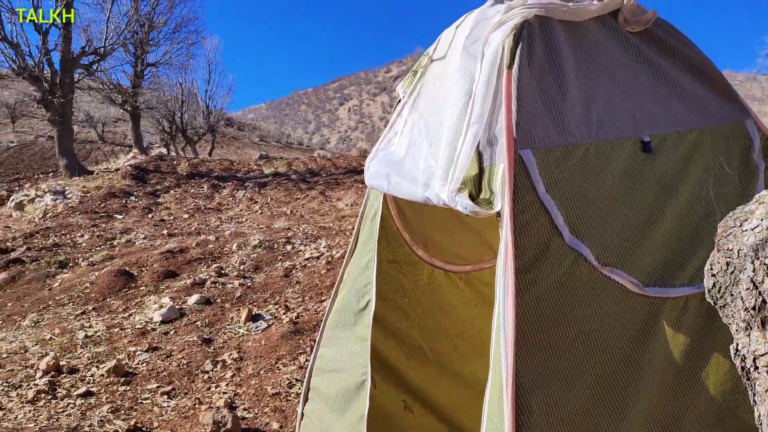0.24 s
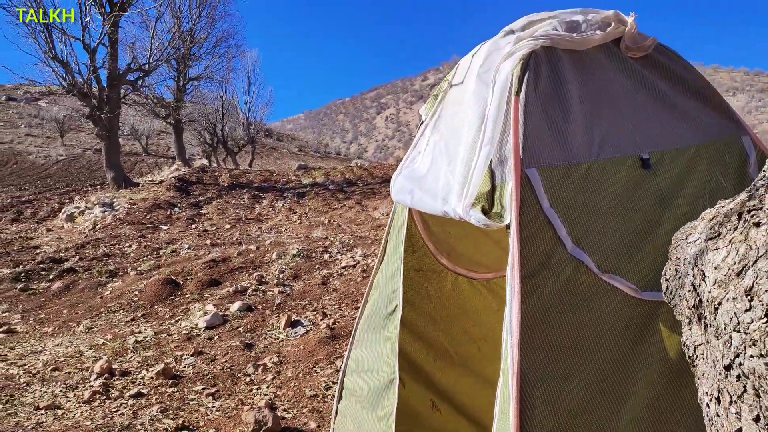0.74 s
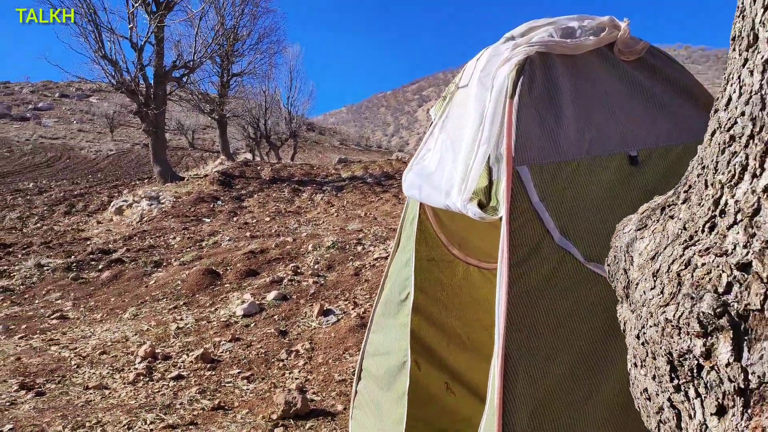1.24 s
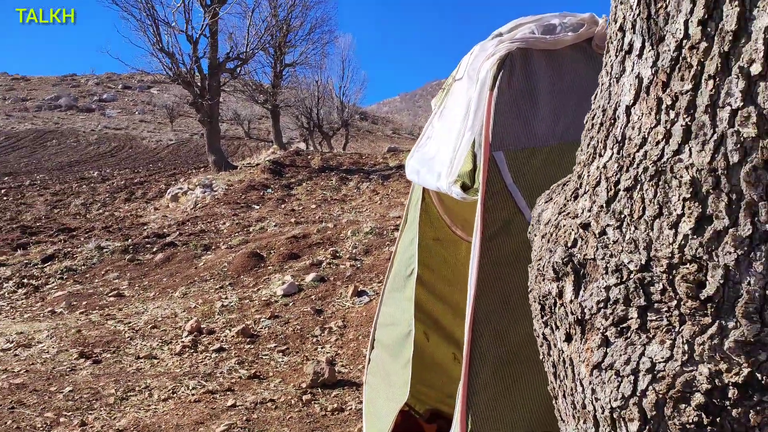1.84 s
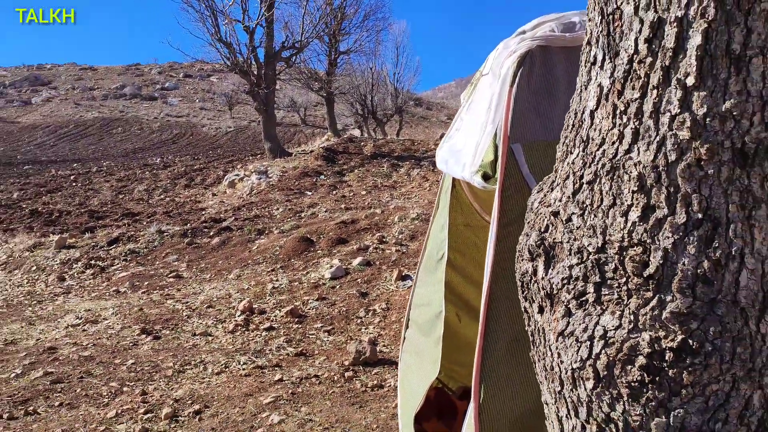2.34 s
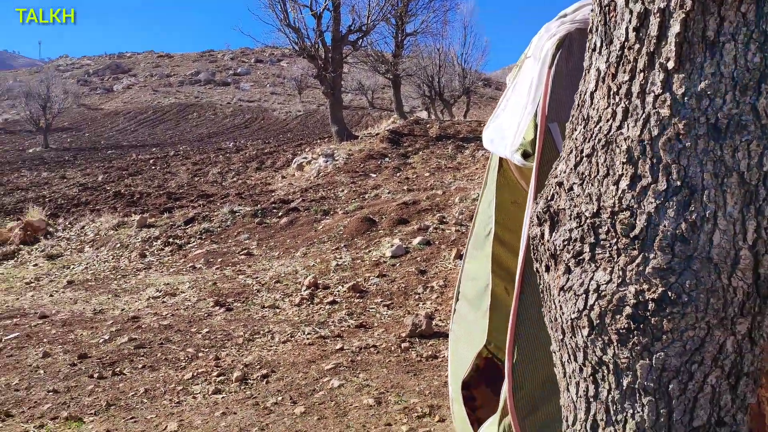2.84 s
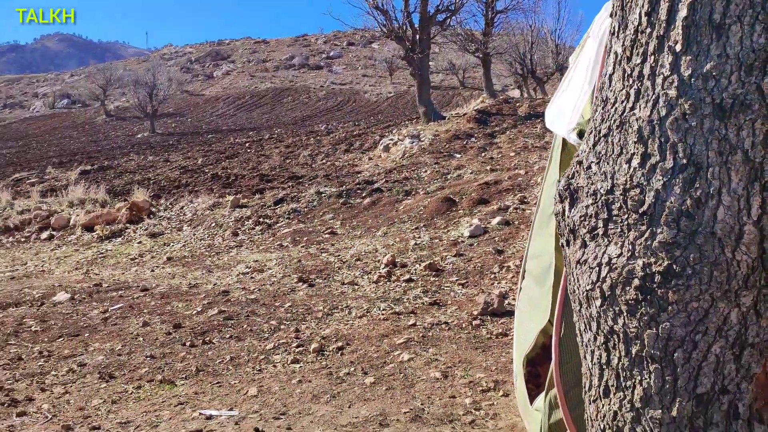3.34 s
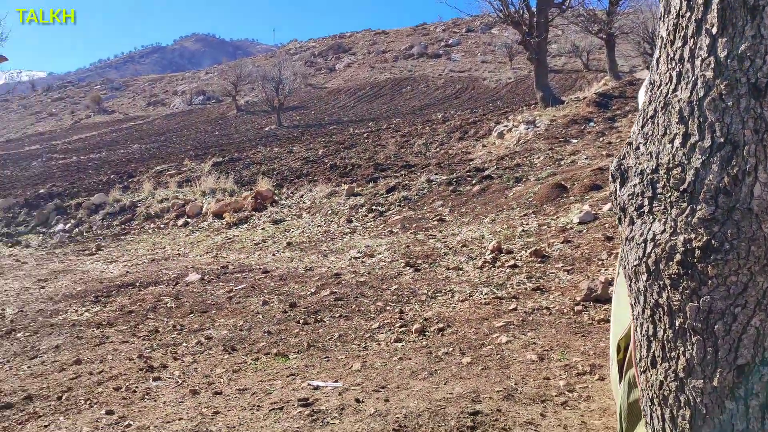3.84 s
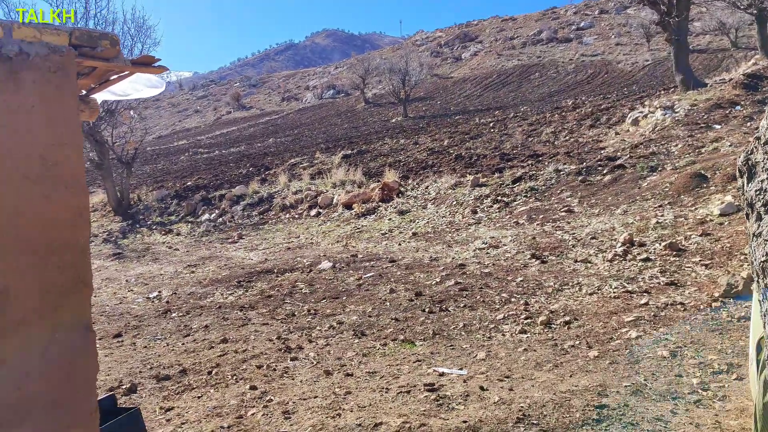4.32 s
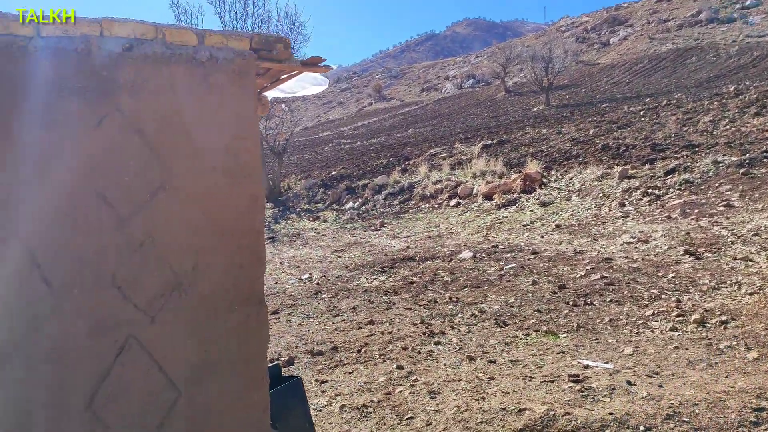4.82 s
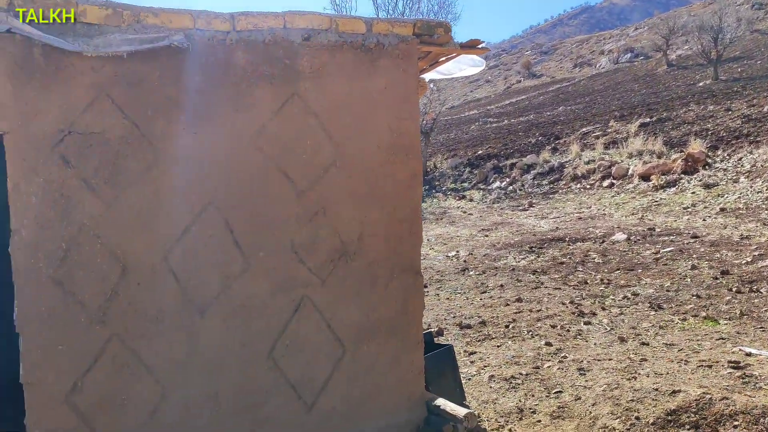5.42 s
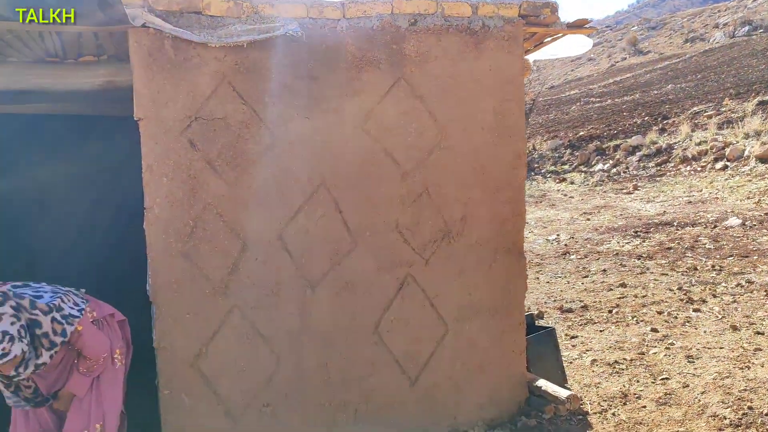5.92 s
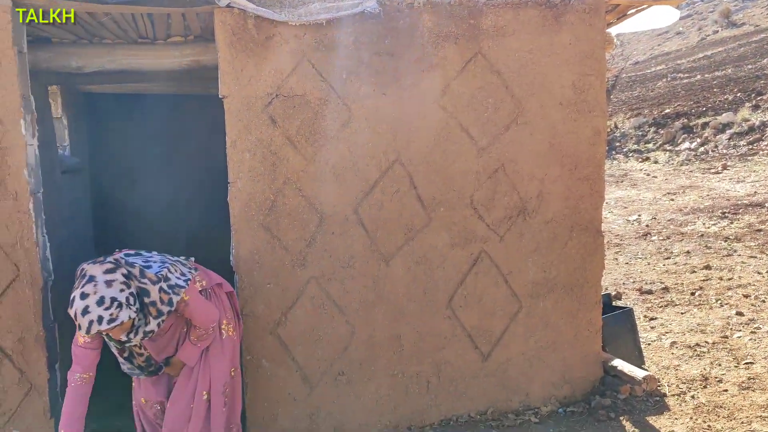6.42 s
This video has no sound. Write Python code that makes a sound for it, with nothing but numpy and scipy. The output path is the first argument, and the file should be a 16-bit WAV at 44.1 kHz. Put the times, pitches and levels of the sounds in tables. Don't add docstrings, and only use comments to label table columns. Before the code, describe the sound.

An open dirt yard, captured close in stereo by a hand-held device, with only a short dry reflection from ground and wall. A far engine drones throughout, a low hum near 84 Hz with a breathy roar, creeping up to about 95 Hz and growing louder; a fainter low machine sags and fades. After tiny dabs, a stiff broom sweeps gritty soil at about 0.25, 1.0, 1.55, 2.1 and 2.65 seconds, each stroke swelling, then lifting off sharply with trickling grit. A faint bird coos, rising, at 0.95. A bright twig snap cracks at 1.76, and pebbles tick throughout. The crisp broom begins mostly right, then broadens toward the left between 2.8 and 5 seconds. Lighter strokes follow near 3.3, 3.9, 4.4, 5.1, 5.8 and 6.4. Soft handling knocks land at 2.3, 2.8, 3.3 and 4.6, with higher taps around 5.7.

```python
import sys
import numpy as np
from scipy import signal
from scipy.io import wavfile
from scipy.ndimage import uniform_filter1d

SR = 44100
rng = np.random.default_rng(int(sys.argv[2]) if len(sys.argv) > 2 else 0)


def inscribe(sig):
    pcm = np.round(np.clip(np.atleast_2d(sig).T, -1, 1) * 32767)
    wavfile.write(sys.argv[1], SR, pcm.astype(np.int16))


def attenuation_scalar(level_db):
    decades = np.asarray(level_db, float) / 20
    return 10 ** decades


N = 294147

# (t/s, firing f/Hz, nearness/dB, ground echo on the firing tone/dB, load brightening the roar/dB)
ENGINE = [(0.0, 84.0, -8, 1, -3), (0.6, 84.2, -8, 7.5, 0.9), (1.2, 86.2, -5, 0, -4),
          (1.7, 87.2, -1, -9.5, -4), (2.2, 88.6, -4.5, -9, -6.5), (2.6, 89.6, -3, -1.5, -4.5),
          (3.2, 90.2, -2.5, -1.5, -2), (3.7, 91, -2, 0, 4), (4.1, 92, 0.7, -1.5, 2),
          (4.7, 93, 1, -2.2, 2.5), (5.2, 94, 2, 2.5, 0), (5.75, 94.9, 6.5, -1, -4), (6.2, 95, 3, 0.3, -1),
          (6.67, 95, 5, 2.5, -0.5)]


def evened(x):
    return x / np.sqrt(np.mean(x ** 2) + 1e-20)


def along(rows, t):
    s, *columns = np.transpose(rows)
    return [np.interp(t, s, c) for c in columns]


def across(rows, hz):
    f, *columns = np.transpose(rows)
    return [np.interp(np.log(hz + 1), np.log(f + 1), c)[:, None] for c in columns]


def smoothed(x, bins, frames):
    return uniform_filter1d(uniform_filter1d(x, size=bins, axis=1), size=frames, axis=2)


def drift(count, span_s):
    width = max(int(span_s * SR), 1)
    return evened(uniform_filter1d(uniform_filter1d(rng.standard_normal(count), width), width))


def split(x, edge_hz):
    low = signal.sosfiltfilt(signal.butter(4, edge_hz, fs=SR, output="sos"), x)
    return low, x - low


def firing_turns(hz):
    return 2 * np.pi * np.cumsum(hz + 0.7 * drift(N, 0.039)) / SR


def roar():
    # (f/Hz, level per Hz/dB)
    rumble_curve = [(12, -38), (24, -20), (45, -4), (63, -15), (87, 1), (109, -3.5), (135, -5),
                    (179, -12.5), (235, -20), (600, -13), (780, -68), (1320, -120)]
    # (f/Hz, right level/dB, left level/dB)
    roar_curve = [(300, -24, -28.5), (560, -7.5, -16.5), (695, -1, 1), (850, 3, -2), (1070, 0.5, -3.5),
                  (1430, 1, -6.5), (1915, 0.5, -8.5), (2266, -5, -13.5), (2970, -13, -20.5),
                  (4140, -27.5, -27), (5800, -35, -42)]
    # (f/Hz, left-right likeness 0-1)
    likeness = [(30, 1), (100, 0.97), (250, 1), (500, 1), (1000, 0.45), (3000, 0.11)]
    rumble_at_0_db, roar_at_0_db = -47.5, -55
    rumble_share = 0.49
    lead_s = 0.00034

    frames, hz = N // 512 + 5, np.fft.rfftfreq(2048, 1 / SR)
    f = hz[:, None]
    a, b, c, d, patches = rng.standard_normal((frames, 1025, 5)).T
    patches = evened(uniform_filter1d(uniform_filter1d(patches, size=16, axis=0), size=7, axis=1))
    t = np.arange(frames) * 512 / SR
    _, near_db, _, load_db = along(ENGINE, t)

    bright = np.clip((f - 1250) / 400, 0, 1)
    level_db = roar_at_0_db + near_db * np.clip(f / 700, 0.4, 1)
    level_db = level_db + bright * (load_db + 1) - 9.5 + 1.52 * patches
    right_db, left_db = across(roar_curve, hz)

    rumble_db = rumble_at_0_db + rumble_share * near_db
    rumble_db = np.where(f < 70, -45 - 1.9 * t, rumble_db)
    rumble = attenuation_scalar(across(rumble_curve, hz)[0] + rumble_db - 7)

    same = np.clip(across(likeness, hz)[0], -1, 1)
    right = a + 1j * b
    early = np.exp(2j * np.pi * f * lead_s)
    left = same * right * early + np.sqrt(1 - same ** 2) * (c + 1j * d)
    left = left * np.hypot(attenuation_scalar(level_db + left_db), rumble)
    right = right * np.hypot(attenuation_scalar(level_db + right_db), rumble)
    return signal.istft(np.array([left, right]), nperseg=2048, noverlap=1536)[1][:, :N]


def drone():
    hz, near_db, ground_db, _ = along(ENGINE, np.arange(N) / SR)
    turns = firing_turns(hz)
    firing_db = -49.5 + 0.87 * near_db + ground_db + 0.63 * drift(N, 0.074) + 1.2 * drift(N, 0.18)
    double_db = -59 + 0.66 * near_db + 2.1 * drift(N, 0.021) + 1.2 * drift(N, 0.09)
    tones = attenuation_scalar(firing_db) * np.sin(turns) + attenuation_scalar(double_db) * np.sin(2 * turns)
    rumble, upper = split(roar(), 940)
    pulses = attenuation_scalar(0.32 * np.cos(turns) + 1.15 * drift(N, 0.0059))
    return np.sqrt(2) * tones + rumble + upper * pulses


def pump():
    # (f/Hz, glide/Hz per s, level/dB, fade/dB per s)
    hum = (53, -2.6, -65, -2.5)
    hz, hz_per_s, db, db_per_s = hum
    t = np.arange(N) / SR
    level = attenuation_scalar(db + db_per_s * t + 1.9 * drift(N, 0.072))
    return np.sqrt(2) * level * np.sin(2 * np.pi * (hz + hz_per_s * t / 2) * t)


def grit(per_s, spread_db):
    size = attenuation_scalar(spread_db * np.minimum(rng.exponential(1, N), 4)) * rng.choice([-1., 1.], N)
    return evened(size * (rng.random(N) < per_s / SR))


def pressure(t):
    # (touch t/s, swell/s, hold/s, bristle pressure/dB, share of low scrape/dB)
    strokes = [(0.246, 0.16, 0.051, -25.5, -5.5), (1.013, 0.17, 0.013, -25, -4.5),
               (1.551, 0.12, 0.018, -27, -2.5), (2.073, 0.08, 0.091, -31, 0.5),
               (2.651, 0.087, 0.1, -34.5, 3), (3.303, 0.1, 0.078, -34, -1.5),
               (3.868, 0.072, 0.15, -42.5, 1.1), (4.436, .11, 0.061, -37, -2.5),
               (5.07, .12, 0.08, -34.5, -4), (5.779, 0.095, 0.017, -32.5, -2),
               (6.387, 0.11, 0.056, -38, -1)]
    # (touch t/s, swell/s, hold/s, pressure/dB, share of low scrape/dB)
    dabs = [(0.07, .01, 0.027, -70, -6), (0.147, 0.013, 0.047, -45.5, -6), (0.657, 0.016, 0.035, -67, 5),
            (0.93, .015, .002, -58, 2.5), (1.761, 0.0034, 0.015, -34.5, 2.9),
            (1.907, .015, 0.029, -61.5, 9), (2.024, 0.019, 0.018, -53.5, 3), (2.49, .02, .1, -68.5, 2),
            (3.042, .02, 0.023, -58, -11), (3.147, 0.0057, 0.074, -42, 1.5),
            (3.666, .012, 0.096, -58.5, -4), (3.809, 0.025, 0.019, -45.5, -3.5),
            (4.386, 0.015, 0.0084, -52, -4), (4.745, 0.014, 0.045, -58.5, -10),
            (4.87, 0.014, 0.13, -64, -4), (5.447, 0.044, 0.023, -59, -7.5), (5.623, .015, 0.028, -68, -14),
            (6.116, .015, 0.041, -74, -7), (6.206, 0.015, 0.12, -65, 4.5)]
    landing_db, swell_bend = -30, 2.12
    lift_db_per_s, lift_knee_s = 227, 0.01
    settle_db, settle_db_per_s = -25, 68
    dull_per_db = 0.1

    touch, swell, hold, peak_db, scrape_db = np.transpose(strokes + dabs)[:, :, None]
    swell = np.maximum(swell, 0.002)
    after = np.maximum(t - touch - swell - np.maximum(hold, 0), 0)
    rise_db = landing_db * np.maximum(1 - (t - touch) / swell, 0) ** swell_bend
    lift_db = -lift_db_per_s * (np.hypot(after, lift_knee_s) - lift_knee_s)
    settling = attenuation_scalar(settle_db - settle_db_per_s * after)
    shape = attenuation_scalar(np.maximum(rise_db, -200)) * np.hypot(attenuation_scalar(lift_db), settling)
    fine = attenuation_scalar(peak_db) * shape
    low = fine * attenuation_scalar(scrape_db) * shape ** -dull_per_db
    return np.linalg.norm(fine, axis=0), np.linalg.norm(low, axis=0)


def broom():
    t = np.arange(N) / SR
    fine, scrape = [np.interp(t, t[::64], gain) for gain in pressure(t[::64])]
    clumps_db = 0.92 * drift(N, 0.00058) + 1.2 * drift(N, 0.027)
    shared, own = grit(5000, 3.4), np.array([grit(9000, 3.2), grit(9000, 0.92)])
    skips = 0.88 * shared + own + 0.65 * rng.standard_normal((2, N))
    bristles = evened(skips * attenuation_scalar(clumps_db))
    grain_s = 0.0012
    trickle = signal.lfilter([1], [1, -np.exp(-1 / (grain_s * SR))], abs(grit(25, 2.5)))
    air = rng.standard_normal((2, N)) * np.hypot(1, attenuation_scalar(-4.5) * evened(trickle))
    bright = fine * bristles + attenuation_scalar(-72.5) * air
    dull = (scrape - fine) * bristles + (attenuation_scalar(-68) - attenuation_scalar(-71)) * air
    return bright + split(dull, 9340)[0]


def pebbles():
    # (t/s, peak level/dB, share of low scrape/dB)
    ticks = [(0.1555, -39, -7), (0.7632, -40, 2.5), (0.836, -36.5, -0.5), (0.9472, -33, -7),
             (1.4501, -41.5, -5), (1.477, -36.5, -6), (1.5284, -37, -3), (1.7604, -8.5, -26),
             (1.929, -42, 3), (1.9555, -51, -13.5), (1.9794, -42, 3), (2.0981, -24, 3), (2.4618, -41, -14),
             (2.4783, -37, -11), (2.5945, -41, -7), (3.0609, -34.5, -2), (3.0899, -32, -22),
             (3.6696, -39.5, 5.5), (4.3979, -33, -5), (4.7536, -38, -8), (4.8753, -41, -15),
             (5.1312, -25, -9), (5.581, -49, 10), (5.6351, -41, -11), (5.663, -41, -4), (6.12, -42.5, -3),
             (6.131, -37.5, 2), (6.1529, -37, -2), (6.1963, -37, 1), (6.2094, -40.5, 5.5)]
    rattle_s = 0.0016
    out, t = np.zeros(N), np.arange(800) / SR
    shape = np.exp(-t / rattle_s) * np.minimum(0.45 + t / 0.001, 1)
    for s, db, scrape_db in ticks:
        snap = rng.standard_normal(800) + 0.96 * (t == 0)
        low, high = split(attenuation_scalar(db - 6) * snap * shape, 5900)
        out[round(s * SR):][:800] += low * attenuation_scalar(scrape_db) + high
    return out


def yard(x, t60=0.088, wet_db=-11):
    taps = np.zeros((2, 8000))
    at = np.arange(10, 7980, 20) + rng.integers(0, 20, (2, 399))
    np.put_along_axis(taps, at, rng.choice([-1., 1.], at.shape), 1)
    taps *= attenuation_scalar(-60 * np.arange(8000) / SR / t60)
    tail = signal.fftconvolve(x, taps / np.linalg.norm(taps[0]), axes=1)[:, :N]
    return (x + attenuation_scalar(wet_db) * tail) / np.sqrt(1 + attenuation_scalar(2 * wet_db))


def ports(x):
    # (t/s, share of the turn 0-1, right port late/ms)
    turn_curve = [
        (0, 0.27, 0.21),
        (1.5, 0.26, 0.33),
        (2.8, 0.48, 0.4),
        (4, 0.8, 0.47),
        (5.2, 1, 0.394),
        (6.67, 0.98, 0.42),
    ]
    # (f/Hz, right before/dB, right after/dB, left before/dB, left after/dB)
    port_curve = [(854, -40, -17.5, -49, -15), (1650, -29.5, -13, -48, -19.5),
                  (2160, -20.5, -9.5, -39.5, -11), (2850, -17.5, -9, -37, -10),
                  (4200, -19.5, -7.5, -25, -12), (4780, -20.5, -15, -31.5, -8.5),
                  (7200, -23, -15, -30, -11), (7900, -27, -19, -42, -19), (8500, -17, -10, -47, -27),
                  (9200, -9, -6, -35, -17), (10460, -11, -10, -34, -7.5), (11750, -3.5, 0.1, -31.5, -13),
                  (13390, -10.5, -7.5, -34, -9), (16700, -12, -16, -18, -8)]
    hz, t, z = signal.stft(x, SR, nperseg=256, noverlap=192)
    turn, late_ms = along(turn_curve, t)
    turn = np.clip(turn, 0, 1)
    right0, right1, left0, left1 = across(port_curve, hz)
    gain = attenuation_scalar([left0 + turn * (left1 - left0), right0 + turn * (right1 - right0)])
    top = (hz > 8500) & (hz < 15500)
    gain /= np.sqrt((gain[:, top] ** 2).sum((0, 1)) / 4 / len(hz))
    z = z * gain
    z[1] *= np.exp(-2j * np.pi * hz[:, None] * late_ms / 1000)
    return signal.istft(z, SR, nperseg=256, noverlap=192)[1][:, :N]


def bird():
    # (start t/s, length/s, first f/Hz, last f/Hz, level/dB)
    call = (0.955, .145, 280, 330, -59)
    start, length, first_hz, last_hz, db = call
    swell_db = -8
    u = np.arange(0, length, 1 / SR) / length
    turns = 2 * np.pi * np.cumsum(first_hz + (last_hz - first_hz) * u) / SR
    level = np.sqrt(2) * attenuation_scalar(db + swell_db * (1 - u)) * signal.windows.tukey(len(u), 0.3)
    out = np.zeros(N)
    out[round(start * SR):][:len(u)] += level * np.sin(turns)
    return out


def knocks():
    # (t/s, peak level/dB, f/Hz)
    taps = [
        (2.287, -39, 300),
        (2.799, -47, 300),
        (3.26, -46, 337),
        (4.592, -42, 300),
        (5.653, -43, 850),
        (5.716, -38.5, 840),
    ]
    out, t = np.zeros(N), np.arange(600) / SR
    for s, db, hz in taps:
        out[round(s * SR):][:600] += attenuation_scalar(db + 7) * np.sin(2 * np.pi * hz * t) * np.exp(-t / 0.0017)
    return out


def scene():
    return ports(yard(broom() + pebbles())) + drone() + pump() + bird() + knocks()


def thinned(x, edge_hz=15650, near_hz=1400, weak_per_db=0.24, sudden_db=10):
    # (f/Hz, threshold in spreads of chance; 0 = half is lost)
    loss = [(600, -9), (1200, -3), (2000, -1.9), (3000, -1), (4700, 0), (6200, .3), (7200, .05),
            (8300, .25), (9500, -.4), (11800, -.7), (13500, -.35), (15300, .1)]
    hz, t, z = signal.stft(x, SR, nperseg=2048, noverlap=1536)
    power, bins = abs(z) ** 2 + 1e-20, int(near_hz / hz[1])
    near = uniform_filter1d(power, bins, 1)
    local = smoothed(power, 9, 5)

    chance = rng.standard_normal((len(t), len(hz), 3)).T
    chance = chance[:2] + 1.6 * chance[2]
    narrow = evened(smoothed(chance, 4, 5))
    wide = evened(smoothed(narrow, 16, 3))
    score = 0.72 * narrow + 0.68 * wide
    score += weak_per_db * 10 * np.log10(local / uniform_filter1d(near, size=5, axis=2))
    score = score[:, ::4, ::2].repeat(4, axis=1).repeat(2, axis=2)[:, :len(hz), :len(t)]
    keep = (score > across(loss, hz)[0]) * (hz[:, None] < edge_hz)
    keep = keep * np.sqrt(near / (uniform_filter1d(power * keep, bins, 1) + 0.039 * near))

    top = split(x.mean(0), 6000)[1] ** 2 + 1e-14
    jump_db = 10 * np.log10(abs(uniform_filter1d(top, size=64) / uniform_filter1d(top, size=1500)))
    sudden = np.pad(jump_db, (256, 2048))[:len(t) * 512].reshape(-1, 512).max(1) > sudden_db
    keep[:, :, uniform_filter1d(1. * sudden, size=2) > 0] = hz[:, None] < 15900
    return signal.istft(z * keep, SR, nperseg=2048, noverlap=1536)[1][:, :N]


def roll_off(x):
    return signal.sosfilt(signal.butter(12, 16300, fs=SR, output="sos"), x)


def record(dry):
    mix = thinned(dry)
    return roll_off(mix)


dry = scene()
out = record(dry)
inscribe(out)
```